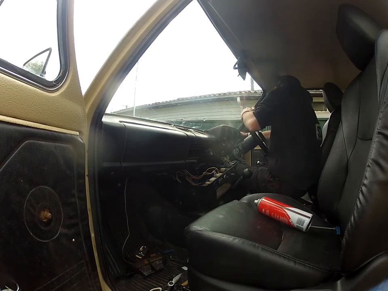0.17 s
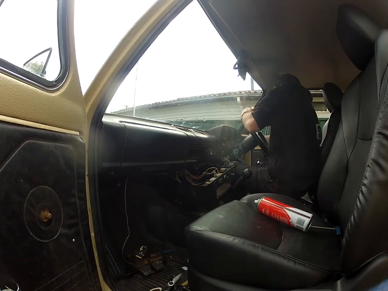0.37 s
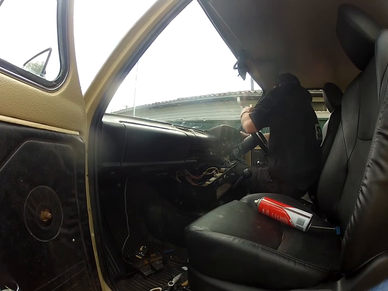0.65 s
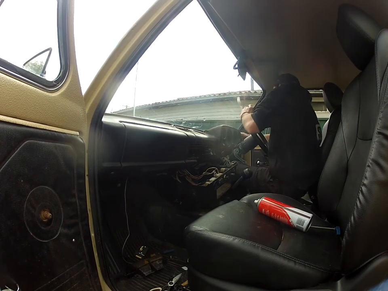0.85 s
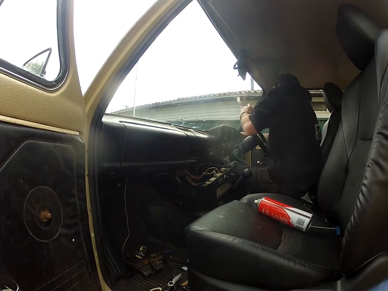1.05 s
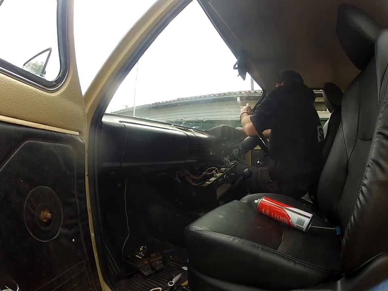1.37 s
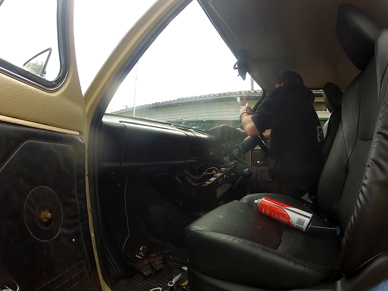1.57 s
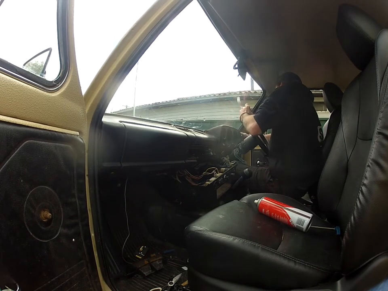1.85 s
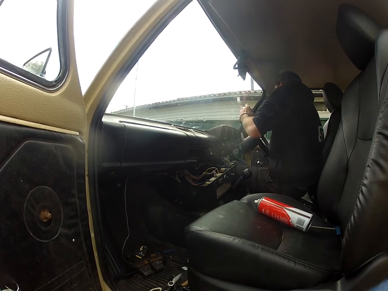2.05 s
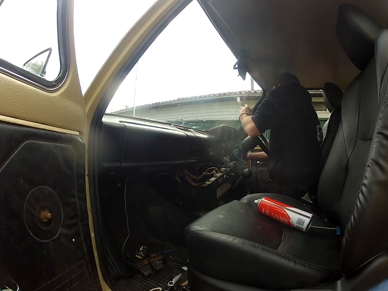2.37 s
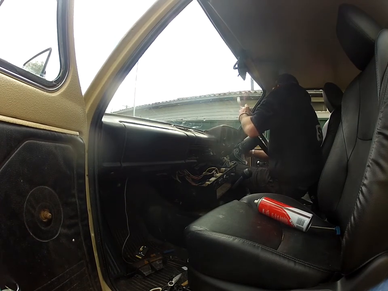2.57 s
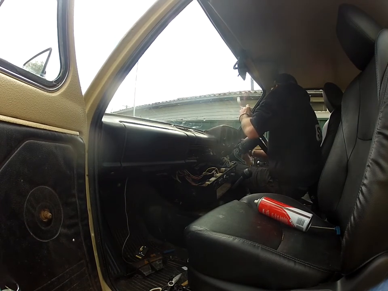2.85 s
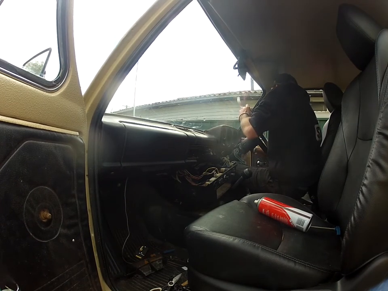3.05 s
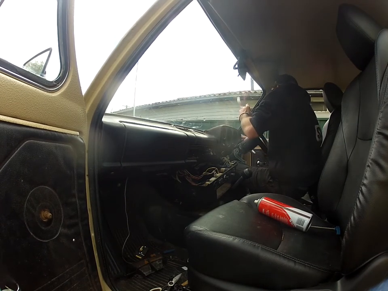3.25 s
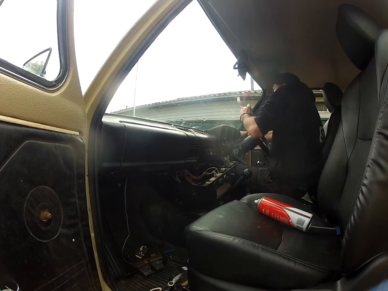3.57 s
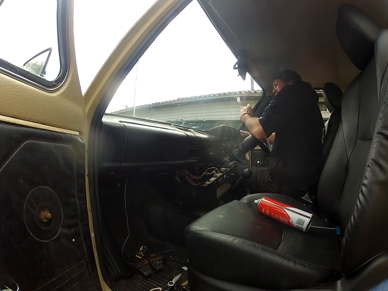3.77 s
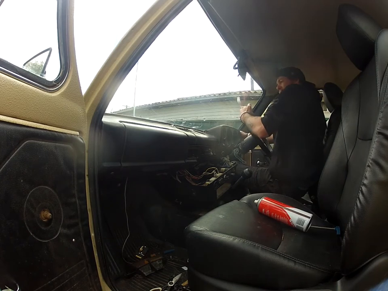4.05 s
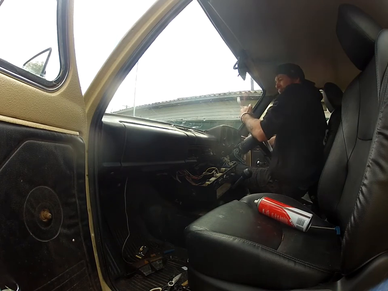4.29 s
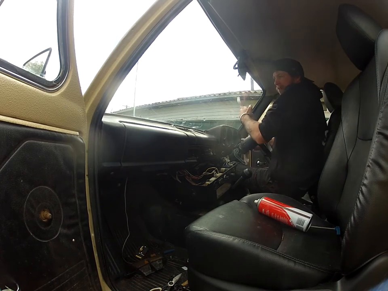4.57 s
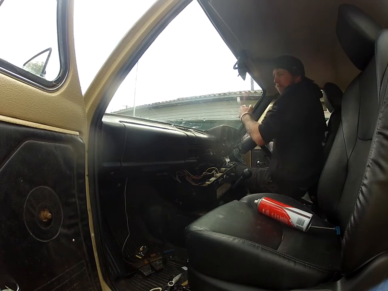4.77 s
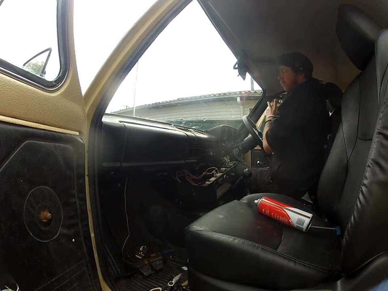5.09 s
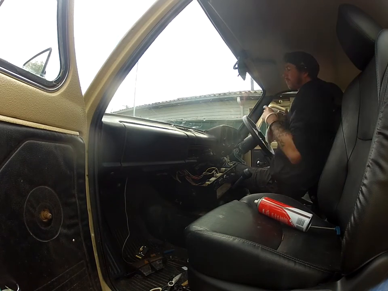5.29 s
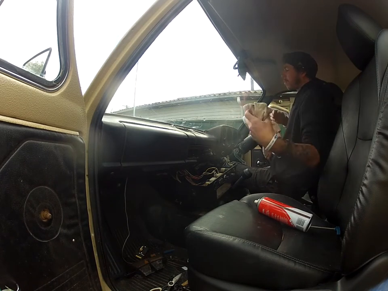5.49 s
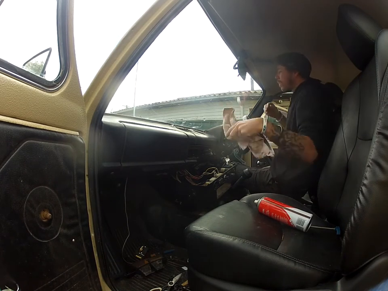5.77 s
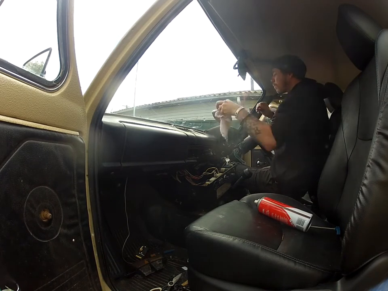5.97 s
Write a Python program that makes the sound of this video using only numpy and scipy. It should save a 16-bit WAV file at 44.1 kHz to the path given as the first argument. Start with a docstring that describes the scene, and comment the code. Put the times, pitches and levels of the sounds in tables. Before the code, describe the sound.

A small mono camera inside a parked car hears faint low outdoor noise and a wavering hum, its coarse sampling adding glassy treble to the birds. At 0 s a rough short whistle and a quick rag stroke begin together. Grainy wiping continues, busiest from 0.25 to 2.2 s, with a dull thump and light knock at 0.73 s and soft seat bumps around 1.1 to 1.5 s. Birds chatter raspily at 0.9, 1.4, 2.55, 3.4 and 4.0 s, among quick whistles, peeps and falling slurred calls at 1.3, 1.8, 2.4 and 3.0 s. Wiping returns from 2.7 to 4.3 s, with a faint hoarse squeak at 3.3 s, then thins. Weaker chatter and slurs come from 4.7 to 5.5 s over a last faint rub. At 5.66 s a loud double-edged knock cracks and booms briefly; a few peeps close the scene near 6 s.

```python
"""A rough, short bird whistle and the first stroke of a rag open the scene, over a low outdoor bed with a hum.
Small birds twitter in a yard, heard from inside a parked car: gliding sines that flutter when rough.
Someone wipes the controls (grainy noise), shifts on the seat (dull noise), thumps the car body (low sines)
and late on knocks the trim (a noise crack and a boom of cabin modes).
A small mono camera samples coarsely, which mirrors every chirp into the high treble."""
import sys
import numpy as np
from scipy import signal
from scipy.fft import rfft, irfft
from scipy.io import wavfile

SR = 44100
rng = np.random.default_rng(int(sys.argv[2]) if len(sys.argv) > 2 else 0)


def transcribe(u):
    """Save the signal u as a 16-bit wav file named by the first command-line argument.

    u: samples, shape (n,) or (channels, n), limited to [-1, 1]; the rate is SR.
    q: integer samples, one column per channel.
    """
    v = np.clip(np.atleast_2d(u).T, -1, 1)
    q = np.round(v * 32767).astype(np.int16)
    wavfile.write(sys.argv[1], SR, q)


N = 270333  # length of the scene [samples]


def amp(db):
    """Turns decibels into gain."""
    return 10 ** (np.asarray(db) / 20)


def unit(x):
    """Scales a sound to an rms of one."""
    return x / np.sqrt(np.mean(x ** 2) + 1e-20)


def add(mix, s, sound):
    """Mixes a sound in at time s [s], cut off at the end of the mix."""
    part = mix[max(round(s * SR), 0):][:len(sound)]
    part += sound[:len(part)]


def seconds(length):
    """Gives a time axis [s]."""
    return np.arange(int(length * SR)) / SR


def sine(hz):
    """Sounds a sine whose pitch [Hz] follows a curve, sample by sample."""
    return np.sin(2 * np.pi * np.cumsum(hz) / SR)


def colour(x, points):
    """Filters by a spectrum of (frequency [Hz], level [dB]) points, joined along log frequency."""
    hz, db = np.transpose(points)
    bins_hz = np.fft.rfftfreq(len(x), 1 / SR)
    gain = amp(np.interp(np.log(bins_hz + 1), np.log(hz + 1), db))
    return irfft(rfft(x) * gain, len(x))


def wander(size, hz):
    """Smooth random drift of rms one: noise under a Gaussian low-pass of the given width [Hz]."""
    f = np.fft.rfftfreq(size, 1 / SR)
    return unit(irfft(rfft(rng.standard_normal(size)) * np.exp(-.5 * (f / hz) ** 2), size))


def resonate(x, hz, width_hz):
    """Rings one fixed resonance."""
    return signal.lfilter(*signal.iirpeak(hz, hz / width_hz, SR), x)


def level(curve):
    """Turns a (time [s], level [dB]) curve into a gain for every sample."""
    return amp(np.interp(np.arange(N) / SR, *np.transpose(curve)))


def trapezoid(t, length, rise_s, fall_s):
    """Fades in and out in straight lines."""
    return np.minimum(np.minimum(t / rise_s, (length - t) / fall_s), 1)


def reflections(x, t60):
    """Sparse echoes of random sign that die away by 60 dB in t60 [s]."""
    t = seconds(.6)
    struck = rng.random(len(t)) < 2000 / SR  # about 2000 echoes a second
    taps = rng.choice([-1, 1], len(t)) * struck * amp(-60 * t / t60)
    return signal.fftconvolve(x, taps / np.linalg.norm(taps))[:N]


# spectrum of the steady outdoor noise: (frequency [Hz], relative density [dB per Hz])
AIR_SPECTRUM = [(12, -41), (20, -14), (43, 0.5), (75, 0), (98, 1), (139, -4.5), (229, -4), (945, -22),
                (1110, -22), (2110, -27.5), (3550, -25.5), (4610, -30.5), (5190, -22), (5700, -28.5),
                (7410, -50), (12500, -120)]


def background(air_db=-56.5, hum_db=-61.0):
    """Distant outdoor noise of fixed colour, with a faint low hum that wavers in pitch and level."""
    air = unit(colour(rng.standard_normal(N), AIR_SPECTRUM))
    hum_hz = 91 + 3.33 * wander(N, 7.3)
    hum = amp(2 * wander(N, 7.0)) * sine(hum_hz)
    return amp(air_db) * air + amp(hum_db) * unit(hum)


def birds(cabin_db=-6, yard_db=-2.5):
    """Notes and chatter scatter round the cabin and echo from the yard; the chatter is the more diffuse."""
    notes = short_whistles() + far_peeps() + peeps() + slurs()
    bursts = chatter()
    scattered = bursts + amp(-6) * reflections(bursts, t60=.06)
    song = notes + amp(-2.0) * scattered
    cabin = reflections(song, t60=0.1)
    yard = reflections(song, t60=0.42)
    return song + amp(cabin_db) * cabin + amp(yard_db) * yard


def note(length, start_hz, middle_hz, end_hz, db, rough, flutter_hz=330, swing=0.102, waver=0.0072, fade_s=0.0038):
    """A whistle glides unsteadily along an arc; in rough notes pitch and strength flutter."""
    t = seconds(length)
    arc = np.polyval(np.polyfit([0, .5, 1], [start_hz, middle_hz, end_hz], 2), t / length)
    flutter = swing * rough * wander(len(t), flutter_hz)
    hz = arc * (1 + flutter + waver * wander(len(t), 145))
    swell = trapezoid(t, length, fade_s, fade_s) * amp(3.1 * np.sin(np.pi * t / length))
    strength = swell * amp(5.5 * rough * wander(len(t), 180))
    return amp(db) * unit(strength * sine(hz))


def glide(length, hz, sweep_hz, bow_hz, db, rough):
    """A note sweeps through its pitch along a slightly bowed line."""
    return note(length, hz - sweep_hz / 2, hz + bow_hz, hz + sweep_hz / 2, db, rough)


# short whistles, most sweeping up (+) or down (-), and three faint low falling tones:
# (time [s], length [s], middle pitch [Hz], sweep [Hz], level before echoes [dB rms], roughness [0-1])
SHORT_WHISTLES = [(0.0, 0.05, 3500, 500, -49.5, .55), (0.568, 0.031, 4000, -1370, -55, .5),
                  (.626, 0.031, 3050, 302, -54.5, .45), (0.722, .077, 4950, 700, -59, .4),
                  (1.235, 0.028, 3200, -700, -50, 0.28), (1.39, 0.044, 3380, 442, -51.5, 0.36),
                  (1.467, 0.025, 2930, 750, -51, 0.17), (1.557, .033, 4870, 702, -48, 0.17),
                  (1.634, 0.038, 4400, 1372, -49.5, 0.23), (2.03, 0.033, 3220, 1180, -51, 0.17),
                  (2.912, 0.1, 4220, -2000, -54.5, .14), (2.981, .035, 1950, -900, -67, 0),
                  (3.014, .033, 2450, -1200, -66, .1), (3.239, .055, 1750, -1100, -64, 0.17),
                  (3.324, .045, 3470, 632, -57.5, 0.43), (3.682, 0.053, 3350, -1300, -53, 0.54),
                  (4.434, .14, 4620, 0, -69, 0.38), (4.819, 0.036, 3200, 468, -55.5, 0.48),
                  (5.339, 0.078, 3600, -870, -54.5, 0.84), (5.7, .09, 2680, 600, -69, .17),
                  (5.778, 0.082, 3600, -1600, -57.5, 0.68)]


def short_whistles(bow_hz=40.2):
    """Short whistles, most sweeping quickly, many roughened by flutter; three are faint low falling tones."""
    out = np.zeros(N)
    for s, length, hz, sweep_hz, db, rough in SHORT_WHISTLES:
        add(out, s, glide(length, hz, sweep_hz, bow_hz, db, rough))
    return out


PEEP_ROUGH = 0.067  # shared by near and far peeps


def far_peeps(per_s=3.6, length=.09, low_hz=2920, high_hz=5080, sweep_hz=600, bow_hz=118.6, db=-71.5):
    """Birds further off peep faintly at random times, pitches and sweeps (up to sweep_hz either way)."""
    out = np.zeros(N)
    for when, pitch, sweep in rng.random((round(per_s * N / SR), 3)):
        hz = low_hz + pitch * (high_hz - low_hz)
        peep = glide(length, hz, sweep_hz * (2 * sweep - 1), bow_hz, db, PEEP_ROUGH)
        add(out, when * N / SR, peep)
    return out


def stroke(length, db, grip_share=0.23, lift_s=0.039, ease_db=1.5):
    """Pressure of one stroke: the cloth takes hold, eases off along its length, and lifts."""
    t = seconds(length)
    return amp(db - ease_db * t / length) * trapezoid(t, length, grip_share * length, lift_s)


# strokes of the rag: (time [s], length [s], level before easing off [dB])
RAG_STROKES = [(0.0, 0.066, -52), (0.252, 0.33, -53), (0.582, 0.2, -54.5), (0.835, 0.22, -57),
               (1.026, 0.27, -51.5), (1.303, 0.11, -47), (1.419, 0.084, -52), (1.53, 0.084, -58.5),
               (1.597, 0.13, -52), (1.749, .3, -52), (2.013, 0.23, -58), (2.7, 0.085, -61),
               (2.95, 0.15, -58.5), (3.14, 0.17, -57), (3.26, 0.25, -52.5), (3.488, .41, -58.5),
               (3.916, 0.19, -55.5), (4.109, 0.21, -55.5), (4.532, 0.095, -61), (5.138, 0.35, -62.5)]
# spectrum of the rubbing cloth: (frequency [Hz], relative density [dB per Hz])
RAG_SPECTRUM = [(120, -41), (200, -0.5), (354, -8.5), (645, -6), (877, -12), (1010, -8), (2020, -9.5),
                (3340, -6.5), (4540, -5), (5600, -11.5), (7280, -40), (12300, -120)]


def rag(uneven_db=1.25):
    """Cloth catches and slips in fine grains under each stroke, with a light touch between strokes."""
    pressure, touch = np.zeros(N), np.zeros(N)
    for s, length, db in RAG_STROKES:
        add(pressure, s, stroke(length, db))
    add(touch, .1, stroke(5.35, -65.5))
    grains = rng.standard_normal(N) * amp(1.53 * wander(N, 52) + 1.65 * wander(N, 900))
    cloth = unit(colour(grains, RAG_SPECTRUM))
    return np.hypot(pressure, touch) * amp(uneven_db * wander(N, 15)) * cloth


# level of the seat's rustle as the body leans and settles: (time [s], level [dB])
SEAT_SHIFTING = [(0.0, -61), (1.05, -58.5), (1.35, -52.5), (1.72, -61), (1.85, -56), (2.1, -64.5),
                 (3.1, -64.5), (3.42, -54.5), (3.8, -61.5), (4.05, -57.5), (4.5, -63.5), (5.35, -62),
                 (5.6, -68)]
# spectrum of the rustle: (frequency [Hz], relative density [dB per Hz])
SEAT_SPECTRUM = [(59, -29), (100, 1.5), (118, -4), (205, -5), (420, -16), (601, -14.5), (791, -23),
                 (900, -17), (1170, -26), (1980, -120)]
# soft bumps and rubs on seat and wheel:
# (time [s], level at onset [dB], pitch [Hz], decay by 60 dB [s])
SOFT_BUMPS = [(0.733, -43, 595, 0.1), (1.132, -41, 297, 0.13), (1.149, -42, 270, 0.074),
              (1.19, -42.5, 398, 0.24), (1.236, -44, 446, 0.11), (1.31, -45, 300, 0.11),
              (1.544, -47.5, 160, 0.17), (2.208, -48, 285, 0.1), (2.287, -52.5, 480, 0.23),
              (2.423, -48.5, 222, 0.089), (2.788, -46, 298, 0.048), (3.178, -43, 380, 0.063),
              (3.937, -48, 266, 0.17), (4.557, -57, 1480, 0.08), (4.775, -48.5, 203, 0.21),
              (5.614, -43.5, 300, 0.073)]


def seat():
    """Upholstery rustles dully as coloured noise; elbows and knees bump it, noise in a broad resonance."""
    out = level(SEAT_SHIFTING) * unit(colour(rng.standard_normal(N), SEAT_SPECTRUM))
    t = seconds(.3)
    for s, db, hz, t60 in SOFT_BUMPS:
        narrow = resonate(rng.standard_normal(len(t)), hz, 0.31 * hz)
        rub = unit(resonate(narrow, hz, 2.1 * hz))
        add(out, s, amp(db - 60 * t / t60) * rub)
    return out


def burst(length, db, fade_db, top_hz, sink_hz, dive_hz, sweeps_per_s=35, uneven=0.1727):
    """Many times a second the pitch drops fast and climbs back; the whole burst sinks as its level slopes."""
    t = seconds(length)
    turns = sweeps_per_s * np.cumsum(1 + .2 * wander(len(t), 15.1)) / SR
    # one turn: hold the top, drop fast, climb most of the way, then ease back to the top
    dive = np.interp(turns % 1, [0, .25, .42, .78, 1], [0, 0, 1, .1, 0])
    dive *= 1 + uneven * wander(len(t), 24.6)
    rasp_hz = 290 * wander(len(t), 450)
    hz = top_hz - sink_hz * t / length - dive_hz * dive + rasp_hz
    voice = amp(-2 * dive + 2 * wander(len(t), 100)) * sine(hz)
    edges = trapezoid(t, length, 0.018, 0.022)
    return amp(db - fade_db * t / length) * unit(voice) * edges


# bursts of chatter: (time [s], length [s], starting level before scatter and mix [dB],
# fade over the burst [dB], top pitch [Hz], sinking of the pitch [Hz], depth of the dives [Hz])
CHATTER_BURSTS = [(0.439, .26, -55.5, 4, 4953, 701, 1290), (0.913, 0.1, -44, 2, 5400, -16, 1013),
                  (1.005, 0.22, -42, 10.5, 5116, 251.5, 1614), (1.434, .27, -44.5, 6.5, 5325, 452.5, 1252),
                  (2.555, 0.25, -44, 6, 5460, 597.5, 1554), (3.382, 0.35, -44.5, 10, 5440, 800.5, 1459),
                  (3.999, 0.24, -43.5, 8, 5400, 255, 1556), (4.723, 0.099, -50, -3.5, 5306, 98, 1430),
                  (4.828, 0.15, -52.5, 7, 5370, 296, 1924), (5.292, 0.22, -55.5, 7.5, 5140, 1191, 1130)]


def chatter():
    """Near birds chatter in bursts of fast, raspy pitch dives."""
    out = np.zeros(N)
    for s, *shape in CHATTER_BURSTS:
        add(out, s, burst(*shape))
    return out


# thumps that rock the car body: (time [s], level at onset [dB], pitch [Hz], decay by 60 dB [s])
BODY_THUMPS = [(0.717, -38, 138, 0.11), (.742, -40, 45.3, 0.26), (1.484, -44.5, 47, 0.52),
               (1.869, -45.5, 140, 0.32), (3.32, -49, 41.8, 0.69), (4.13, -47, 56.4, 0.34)]


def thumps():
    """The car body answers a shift of weight with a few slow swings: low decaying sines."""
    out, t = np.zeros(N), seconds(.4)
    for s, db, hz, t60 in BODY_THUMPS:
        add(out, s, amp(db - 60 * t / t60) * np.sin(2 * np.pi * hz * t))
    return out


# hard contacts on the trim: (time [s], level of the crack [dB])
TRIM_CONTACTS = [(0.735, -37.5), (1.305, -66), (5.6615, -24), (5.6663, -43), (5.6675, -24)]
# spectrum of the crack: (frequency [Hz], relative density [dB per Hz])
TRIM_SPECTRUM = [(180, -11), (300, 3), (903, -26), (1200, -8), (1570, -14), (2080, -11.5), (2860, -21),
                 (3690, -11), (4230, -25), (5270, -14), (5600, -21), (7280, -52), (12300, -120)]
# panel and cabin modes under the loud knock:
# (frequency [Hz], level before the soft onset [dB], decay by 60 dB [s])
CABIN_MODES = [(55, -50, 0.17), (96, -46, 0.065), (146, -24, 0.14), (213, -26.5, 0.15),
               (234.2, -25.5, 0.16), (276, -21, 0.059), (437, -21.5, 0.056), (494, -29.5, 0.05),
               (620, -32.5, 0.045), (1103, -36, 0.037), (950, -45, 0.1)]


def knock(crack_t60=0.0088, tail_db=-21, tail_t60=0.16, boom_s=5.6685):
    """Hard contacts crack on the trim as brief noise with a weak tail; panel and cabin boom at the loudest."""
    out, t = np.zeros(N), seconds(.4)
    for s, db in TRIM_CONTACTS:
        decay = amp(-60 * t / crack_t60) + amp(tail_db - 60 * t / tail_t60)
        crack = unit(colour(rng.standard_normal(len(t)), TRIM_SPECTRUM))
        add(out, s, amp(db) * decay * crack)
    boom = sum(amp(db - 60 * t / t60) * np.sin(2 * np.pi * hz * t) for hz, db, t60 in CABIN_MODES)
    soft_onset = 1 - np.exp(-t / 0.0016)
    add(out, boom_s, boom * soft_onset)
    return out


# peeps, clean notes arched about one pitch:
# (time [s], length [s], pitch [Hz], arch [Hz], level before echoes [dB rms])
PEEP_NOTES = [(0.929, 0.037, 4450, 44, -50.5), (1.487, .055, 3250, 142, -50), (1.5, .05, 3850, 85, -55),
              (1.75, 0.057, 5640, 90, -56), (2.37, 0.11, 2900, 138, -73), (2.982, .05, 5130, 150, -57),
              (3.243, 0.077, 4420, 40, -53.5), (4.258, 0.056, 3360, 13, -64),
              (4.418, 0.062, 3700, -64, -64), (5.592, .04, 3450, 20, -54), (5.883, .12, 2900, -340, -73.5),
              (6.057, .063, 3130, 122, -63), (6.097, 0.049, 4420, 38, -52)]


def peeps():
    """Near birds peep: nearly clean whistles bend away from one pitch and return."""
    out = np.zeros(N)
    for s, length, hz, arch_hz, db in PEEP_NOTES:
        add(out, s, glide(length, hz, 0, arch_hz, db, PEEP_ROUGH))
    return out


# slurred calls, a falling whistle that breaks into a rasp: (time [s], whistle length [s], top pitch [Hz],
# end pitch [Hz], whistle level before echoes [dB rms], rasp level before echoes [dB rms])
SLUR_CALLS = [(1.273, 0.081, 5154, 3680, -48.5, -54), (1.832, .085, 4970, 3953, -49, -52.5),
              (2.412, 0.064, 4623, 4514, -51, -57), (3.015, 0.062, 5190, 3885, -46.5, -52),
              (5.025, .06, 4560, 4310, -54, -59), (5.486, 0.081, 5066, 4045, -53.5, -56.5)]


def slurs(bow_hz=30, rough=0.11, trail_s=.02, trail_db=-6, trail_rough=0.54):
    """A whistle falls, trailed by a weaker, rougher copy of its glide, and ends in a fluttering rasp."""
    out = np.zeros(N)
    for s, length, top_hz, end_hz, db, rasp_db in SLUR_CALLS:
        fall = length, (top_hz + end_hz) / 2, end_hz - top_hz, bow_hz
        add(out, s, glide(*fall, db, rough))
        add(out, s + trail_s, glide(*fall, db + trail_db, trail_rough))
        rasp = glide(.1, 3460, -246, 0, rasp_db, rough=0.76)  # same pitches in every slur
        add(out, s + length, rasp)
    return out


# one faint squeak under the rag: (time [s], length [s], level before easing off [dB])
SQUEAK_STROKE = (3.33, 0.263, -58.5)


def squeak(hz=1820, width_hz=240):
    """The rubbed surface sings hoarsely: noise in one narrow resonance under the pressure of a stroke."""
    s, length, db = SQUEAK_STROKE
    out, pressure = np.zeros(N), stroke(length, db)
    voice = unit(resonate(rng.standard_normal(len(pressure)), hz, width_hz))
    add(out, s, pressure * voice)
    return out


def scene():
    """One microphone hears every source and feeds both channels."""
    mono = background() + birds() + rag() + seat() + thumps() + knock() + squeak()
    return np.tile(mono, (2, 1))


def record(dry, corner_hz=5680, steepness=44, camera_rate=12000, hold_count=4, edge_hz=15400):
    """The camera samples slowly and holds each value, mirroring the sound about half its rate; then a band limit."""
    hz = np.fft.rfftfreq(N, 1 / SR)
    smooth = irfft(rfft(dry) / np.sqrt(1 + (hz / corner_hz) ** steepness), N)
    # a grid hold_count times finer than the camera's rate, so that each value can be held as steps
    fine = signal.resample(smooth, hold_count * round(N * camera_rate / SR), axis=1)
    steps = np.repeat(fine[:, ::hold_count], hold_count, axis=1)
    held = signal.resample(steps, N, axis=1)
    band_limit = signal.firwin(511, edge_hz, window=("kaiser", 9), fs=SR)
    return signal.oaconvolve(held, band_limit[None], "same")


dry = scene()
out = record(dry)
transcribe(out)
```